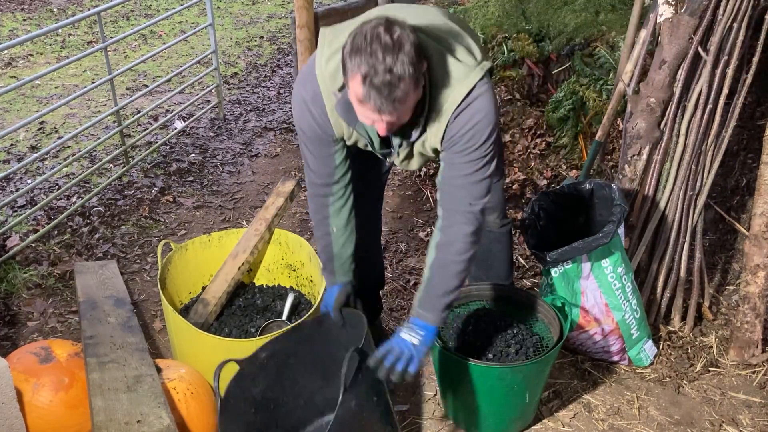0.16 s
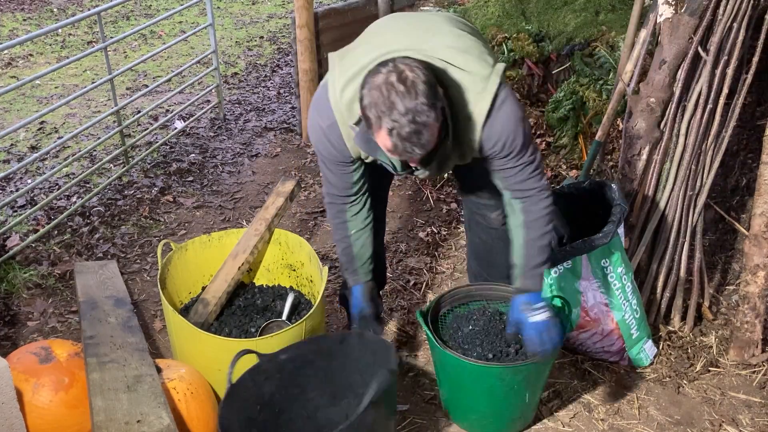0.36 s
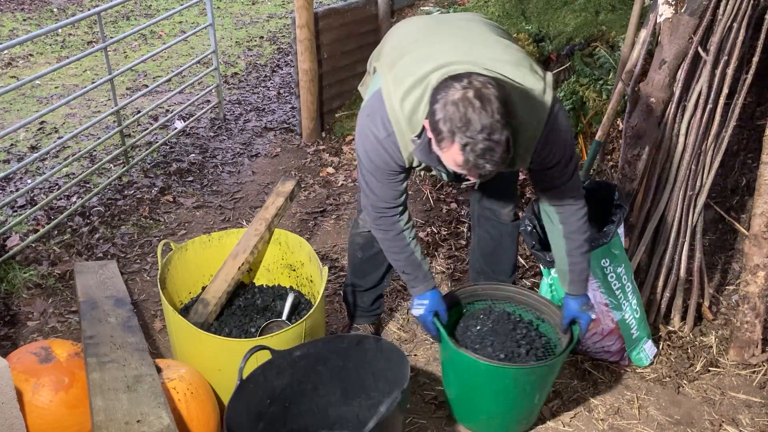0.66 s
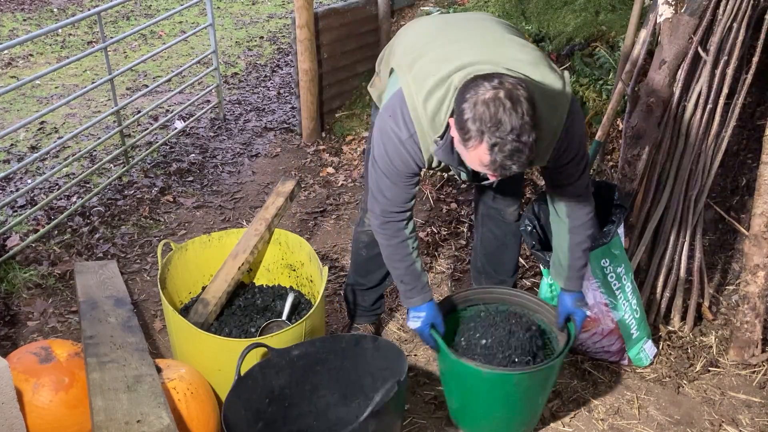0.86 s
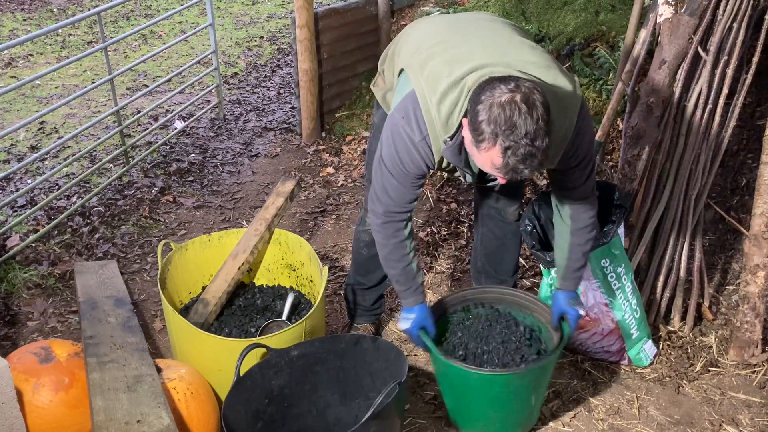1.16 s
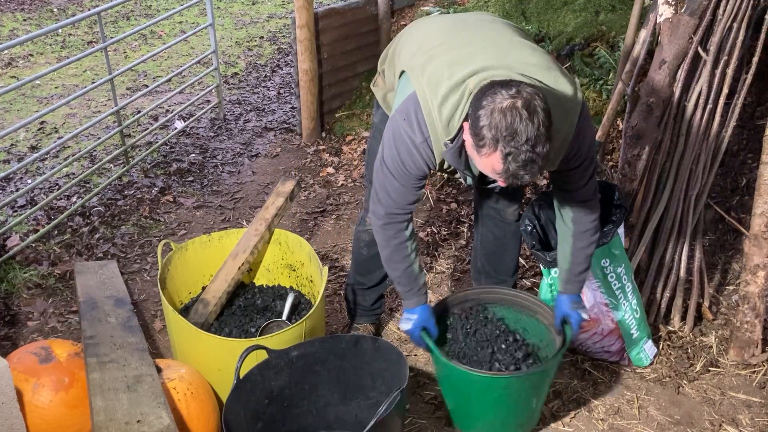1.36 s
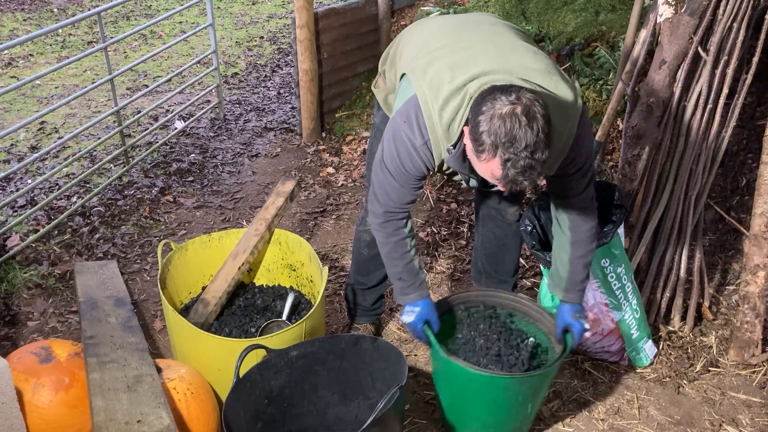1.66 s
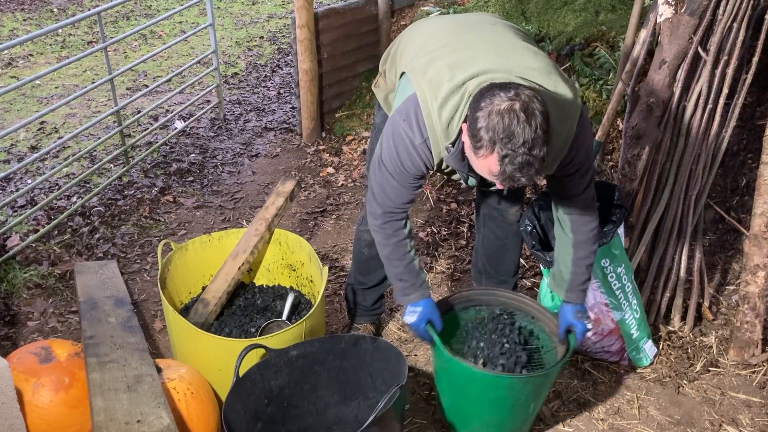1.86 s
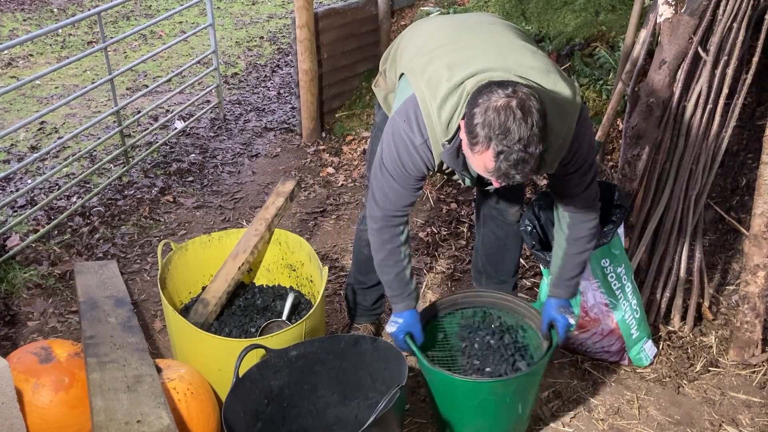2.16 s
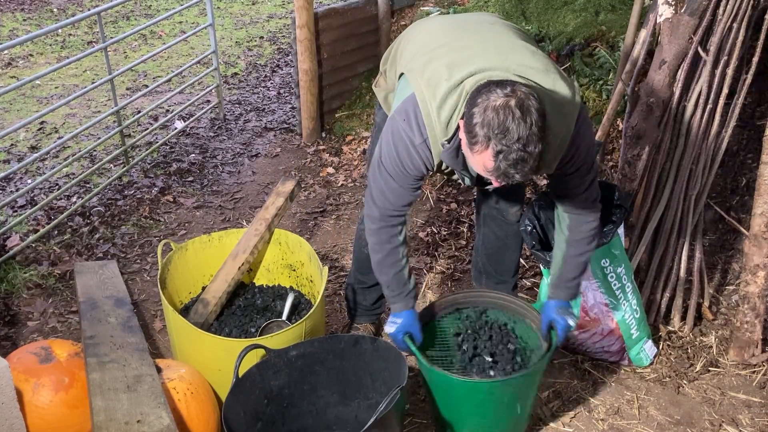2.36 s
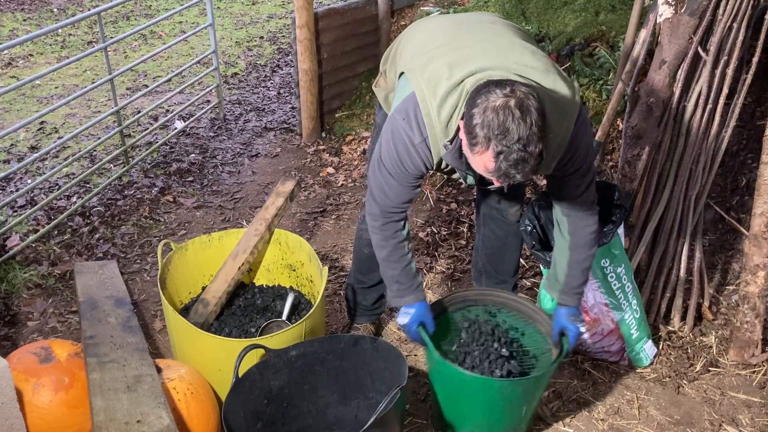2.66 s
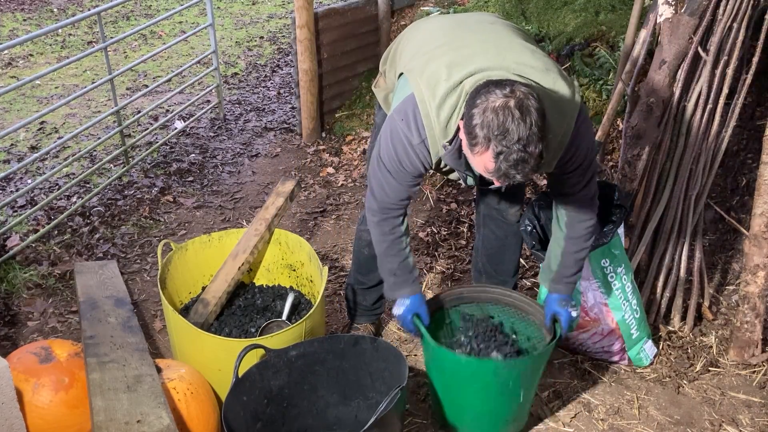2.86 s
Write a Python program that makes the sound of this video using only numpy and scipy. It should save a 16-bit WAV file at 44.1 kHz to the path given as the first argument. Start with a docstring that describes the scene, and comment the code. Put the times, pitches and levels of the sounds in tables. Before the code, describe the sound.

Charcoal lumps shaken fast through a wire sieve over a plastic bucket, after an empty tub lands

```python
"""Charcoal shaken through a sieve

Outdoors, an empty plastic tub lands and booms, with dull scuffs from tub, boots and gloves as it settles.
Then a wire sieve is shaken about ten strokes a second in a plastic bucket. Its rim blows are decaying
modes and coloured noise; the charcoal is random grains, crackling (fine) and clattering (coarse) in surges
and ringing the mesh wires. A scrape, slow pushes of air and coloured noise for the open air lie beneath.
"""
import sys
import numpy as np
from scipy import signal
from scipy.fft import rfft, irfft, next_fast_len
from scipy.io import wavfile
from scipy.ndimage import map_coordinates

SR = 44100
rng = np.random.default_rng(int(sys.argv[2]) if len(sys.argv) > 2 else 0)


def file_out(sig):
    """Save sig as 16-bit WAV at sys.argv[1]."""
    # one column per channel
    cols = np.atleast_2d(sig).T
    # limit, then scale
    lim = np.clip(cols, -1, 1)
    pcm = np.round(lim * 32767).astype(np.int16)
    wavfile.write(sys.argv[1], SR, pcm)


N = 132300  # samples, 3 s


def amp(db):
    """Level in dB to linear gain."""
    return 10 ** (np.asarray(db) / 20)


def unit(x):
    """Scale a signal to rms 1."""
    return x / np.sqrt(np.mean(x ** 2) + 1e-20)


def noise(t):
    """White noise as long as the time axis t."""
    return rng.standard_normal(len(t))


def add(track, s, sound):
    """Lay a sound into the track at s seconds."""
    i = max(0, round(s * SR))
    track[i:i + len(sound)] += sound[:N - i]


def coloured(x, points):
    """Filter x causally (minimum phase) to a curve of (frequency, level) points, at rms 1."""
    m = 2 * next_fast_len(len(x))
    hz, db = np.transpose(points)
    log_bins = np.log(np.fft.rfftfreq(m, 1 / SR) + 1)
    curve_db = np.interp(log_bins, np.log(hz), db)
    # folding the cepstrum onto positive time makes the filter causal
    cepstrum = irfft(np.log(amp(curve_db)), m)
    cepstrum[1:m // 2] *= 2
    cepstrum[m // 2 + 1:] = 0
    response = np.exp(rfft(cepstrum))
    return unit(irfft(rfft(x, m) * response, m)[:len(x)])


def decay(t, t60):
    """Exponential fade that falls 60 dB in t60 seconds."""
    return np.exp(-np.log(1000) * t / t60)


WAVER_PER_S, WAVER_RADIANS = 93.3, 0.55  # random points per second, depth


def waver(t):
    """Flexing plastic never holds its pitch: a random drift of phase, zero at the blow."""
    drift = map_coordinates(rng.standard_normal(128), [t * WAVER_PER_S], mode="mirror")
    return WAVER_RADIANS * (drift - drift[0]) * np.minimum(t * WAVER_PER_S, 1)


def ring(modes, t, levels_db=None):
    """Sum of damped, wavering sine modes, optionally each with its own extra level."""
    hz, db, t60 = np.transpose(modes)[:, :, None]
    if levels_db is not None:
        db = db + levels_db
    drift = np.array([waver(t) for _ in modes])
    waves = np.sin(2 * np.pi * hz * t + drift)
    return np.sum(amp(db) * decay(t, t60) * waves, axis=0)


def grains(per_s, spread_db):
    """Random tiny collisions of either sign, many weak and a few strong."""
    size = amp(spread_db * np.minimum(rng.exponential(size=N), 5.5))
    hits = rng.random(N) < per_s / SR
    return hits * size * rng.choice([-1, 1], N)


# lump collisions, also used by the scrape and the dull scuffs
LUMPS_PER_S, LUMP_SPREAD_DB = 1100, 1.5

WALL_DB, WALL_T60_S = 10.5, 0.11
THUD_DB, THUD_HZ, THUD_T60_S, THUD_ATTACK_S = 8.5, 99, 0.03, 0.0011
BASE_DB, BASE_HZ, BASE_T60_S = -11.5, 55, 0.15  # driven by the thud level
CLACK_DB, CLACK_T60_S = 1.5, 0.05
RIM_DB, RIM_SCATTER_DB = -3.5, 3
RIM_SHIFT = 0.11  # spread of the natural log of the rim's time scale from blow to blow

# blows on the bucket, first from the passing tub, then from the sieve rim:
# (time [s], wall pitch [Hz], relative wall level [dB], relative thud level [dB], relative clack level [dB])
BUCKET_BLOWS = [(.004, 222.6, -38, -38, -43.5), (0.028, 227, -38, -60, -57),
                (0.8024, 207, -41.5, -17, -33.5), (.812, 240, -32.5, -41, -25),
                (0.8825, 225, -28, -34, -32.5), (0.908, 241, -40, -50, -32), (0.981, 240, -31.5, -22, -46),
                (1.094, 227, -23, -51, -23), (1.11, 258, -26, -55, -28), (1.1856, 204, -38, -17.5, -29),
                (1.196, 232, -33, -57, -31.5), (1.2887, 239, -30, -51, -29), (1.3, 233, -34, -19.5, -30),
                (1.3843, 244, -30.5, -31, -29), (1.4771, 212.5, -30, -22, -27.5),
                (1.49, 277, -36, -32, -24), (1.6011, 216, -32.5, -22, -27), (1.6654, 226, -31, -37, -25.5),
                (1.6772, 238, -30.5, -18, -36), (1.7888, 254.4, -24, -22, -25),
                (1.859, 228, -32, -38, -30.5), (1.87, 230.5, -29, -29, -32),
                (1.9771, 256.5, -22.5, -19.5, -29), (2.069, 232, -26, -39, -25),
                (2.086, 237, -37, -33, -37), (2.1757, 257, -23.5, -15.5, -25),
                (2.2598, 239, -27.5, -26, -25), (2.298, 245, -55, -45, -30), (2.3788, 242, -28, -17, -31.5),
                (2.4629, 237, -25, -52, -30), (2.476, 245, -35, -40, -29), (2.581, 256, -28, -22.5, -25),
                (2.6635, 230, -30, -26, -26.5), (2.778, 238, -29.5, -13.5, -26.5),
                (2.792, 243, -28.5, -42, -34), (2.871, 233, -27.5, -21, -38), (2.883, 249, -28, -35, -35)]
# upper modes of bucket and rim before each blow's shift and scatter:
# (frequency [Hz], relative level [dB], t60 [s])
RIM_MODES = [(463.6, -1.5, 0.036), (571, 2.5, 0.045), (654, 3, 0.065), (782, -9, 0.11), (875, -7, 0.15),
             (1047, -11, 0.12)]
# tone of clattering lumps and of the clack: (frequency [Hz], relative level [dB])
CLATTER_TONE = [(100, -22.5), (250, 6), (380, -2), (520, 0), (680, 4.5), (900, 1), (1100, -8), (1350, -9.5),
                (1580, -3), (2000, -30.5), (4000, -14), (16000, -111)]


def knocks():
    """Each blow thuds, rocks the bucket on its base, rings its wall and clacks with its rim modes."""
    out, t = np.zeros(N), np.arange(SR // 4) / SR
    for s, hz, wall_db, thud_db, clack_db in BUCKET_BLOWS:
        wall = decay(t, WALL_T60_S) * np.sin(2 * np.pi * hz * t + waver(t))
        thud = decay(t, THUD_T60_S) * np.cos(2 * np.pi * THUD_HZ * t)
        thud *= 1 - np.exp(-t / THUD_ATTACK_S)
        base = decay(t, BASE_T60_S) * np.sin(2 * np.pi * BASE_HZ * t)
        clack = amp(CLACK_DB) * decay(t, CLACK_T60_S) * coloured(noise(t), CLATTER_TONE)
        # the point of contact scales the rim's pitches, and its decay with them
        rim_time = t * np.exp(RIM_SHIFT * rng.standard_normal())
        scatter_db = RIM_SCATTER_DB * rng.standard_normal((len(RIM_MODES), 1))
        rim = amp(RIM_DB) * ring(RIM_MODES, rim_time, scatter_db)
        body = amp(wall_db + WALL_DB) * wall + amp(thud_db + THUD_DB) * thud
        body -= amp(thud_db + BASE_DB) * base
        add(out, s, body + amp(clack_db) * (clack + rim))
    return out


SURGE_RISE_S, SURGE_FALL_S = 0.014, 0.016  # standard deviations of the power swell
CRACKLE_DB, CLATTER_DB, SLIDE_CLATTER_DB = -1, -6.5, 0.5
CRACKLES_PER_S, CRACKLE_SPREAD_DB = 12000, 1
CLUSTERS_PER_S, CRUMBLE_T60_S = 600, 0.048
TICK_T60_S = 0.045
CLINK_DB = -6  # against the crumbs
MESH_DB = -15.5  # against the crackle

# charcoal thrown across the mesh: (time of peak [s], relative crackle level [dB], relative clatter level [dB])
SURGES = [(0.818, -37.5, -37), (0.903, -36, -44), (0.997, -35, -23), (1.113, -34, -27.5),
          (1.198, -39.5, -28), (1.311, -38, -25), (1.396, -37.5, -25.5), (1.5, -33.5, -24.5),
          (1.608, -30, -25.5), (1.697, -35, -39), (1.796, -31, -31), (1.884, -33, -30), (1.977, -32, -57),
          (2.104, -28.5, -28.5), (2.18, -35, -28.5), (2.285, -28.5, -27.5), (2.394, -30.5, -29),
          (2.49, -28.5, -26.5), (2.593, -28.5, -27.5), (2.695, -30.5, -26), (2.794, -32.5, -27),
          (2.886, -32.5, -24.5)]
# pieces sliding and falling through between surges: (time [s], level [dB])
SLIDE_LEVELS = [(.72, -69), (.78, -49), (.86, -54), (.95, -40.5), (1.04, -41), (1.14, -34), (1.23, -39),
                (1.35, -34), (1.45, -40.5), (1.57, -37.5), (1.67, -42), (1.93, -40.5), (2.05, -39.5),
                (2.22, -42), (2.64, -40.5), (2.74, -39.5), (2.83, -42.5), (2.93, -44), (3, -33.5)]
# single hard strikes of a lump on the wire: (time [s], level [dB])
WIRE_STRIKES = [(0.833, -36), (0.87, -34), (1.24, -39), (1.396, -30), (2.164, -27), (2.359, -29),
                (2.569, -26), (2.682, -24.5), (2.855, -29), (2.882, -26.5)]
# tone of small pieces, and of grit: (frequency [Hz], relative level [dB])
CRACKLE_TONE = [(500, -36), (1200, -7), (2000, -5.5), (3000, -2.5), (3900, -2.5), (4400, 0.5), (5000, -4.5),
                (7000, -7), (8500, -14), (10300, -9.5), (11700, -13.5), (12700, -10.5), (14000, -20.5),
                (16000, -36)]
# ringing wires of the mesh: (frequency [Hz], relative level [dB], t60 [s])
MESH_MODES = [(2566, 14, 0.25), (3870, 14, 0.074), (4430, 17, 0.07), (5900, 11, 0.038)]


def charcoal():
    """Lumps clatter and sprays of grains ring the wires, swelling with every throw over an uneven slide."""
    t = np.arange(N) / SR
    brief = t[:SR // 20]

    # powers of the small and large pieces over time
    slide_db = np.interp(t, *np.transpose(SLIDE_LEVELS), left=-120)
    fine, coarse = amp(slide_db) ** 2, amp(slide_db + SLIDE_CLATTER_DB) ** 2
    for s, crackle_db, clatter_db in SURGES:
        width = np.where(t < s, SURGE_RISE_S, SURGE_FALL_S)
        swell = np.exp(-.5 * ((t - s) / width) ** 2)
        fine += swell * amp(crackle_db + CRACKLE_DB) ** 2
        coarse += swell * amp(clatter_db + CLATTER_DB) ** 2
    for s, db in WIRE_STRIKES:
        add(fine, s, (amp(db) * decay(brief, TICK_T60_S)) ** 2)

    # each cluster sheds a short, fading spray of crumbs
    cluster_power = grains(CLUSTERS_PER_S, LUMP_SPREAD_DB) ** 2
    spray_power = signal.fftconvolve(cluster_power, decay(brief, CRUMBLE_T60_S) ** 2)[:N]
    spray = np.sqrt(np.abs(spray_power))
    crumbs = unit(spray * grains(CRACKLES_PER_S, CRACKLE_SPREAD_DB))

    crackle = np.sqrt(fine) * coloured(crumbs + amp(CLINK_DB) * clinks(), CRACKLE_TONE)
    wires = signal.fftconvolve(crackle, ring(MESH_MODES, t[:SR // 6]))[:N]
    wires = unit(wires) * crackle.std()
    clatter = np.sqrt(coarse) * coloured(grains(LUMPS_PER_S, LUMP_SPREAD_DB), CLATTER_TONE)
    return crackle + amp(MESH_DB) * wires + clatter


CLINKS_PER_S, CLINK_T60_S, CLINK_SPREAD_DB = 1500, 0.015, 1
CLINK_HZ, CLINK_OCTAVES = 5550, 0.3435  # middle pitch, mean distance from it before limiting


def clinks():
    """Brittle pieces ring briefly, each at its own pitch, the higher ones stronger."""
    t = np.arange(SR // 60) / SR
    place, up, down, chance = rng.random((4, int(CLINKS_PER_S * N / SR), 1))
    hz = np.clip(CLINK_HZ * 2 ** (CLINK_OCTAVES * np.log(up / down)), 1200, 18000)
    size = amp(CLINK_SPREAD_DB * np.minimum(-np.log(chance), 4.5))
    waves = size * decay(t, CLINK_T60_S) * np.sin(2 * np.pi * hz * t)
    waves *= np.sqrt(hz)
    where = (place * N).astype(int) + np.arange(len(t))
    return unit(np.bincount(where.ravel(), waves.ravel(), N)[:N])


SCRAPE_S, SCRAPE_WIDTH_S = 1.093, 0.061  # centre, standard deviation of its power
SCRAPE_DB = -34.5  # before the swell

# resonances of the scraped rim: (frequency [Hz], relative level [dB], t60 [s])
SCRAPE_MODES = [(850, 0, 0.033), (1730, -3, 0.013)]


def scrape():
    """The load slides along the rim once; its tiny slips excite two resonances."""
    t = np.arange(N) / SR
    slips = grains(LUMPS_PER_S, LUMP_SPREAD_DB)
    rub = signal.fftconvolve(slips, ring(SCRAPE_MODES, t[:SR // 10]))[:N]
    swell = np.exp(-((t - SCRAPE_S) / SCRAPE_WIDTH_S / 2) ** 2)
    return amp(SCRAPE_DB) * unit(rub) * swell


SWAY_DB, SWAY_S = -24.5, 0.017  # depth of each pulse, its width


def sway():
    """The rocking bucket pushes a slow wave of air at each surge: a dip between two smaller rises."""
    u = (np.arange(N) / SR - np.array(SURGES)[:, :1]) / SWAY_S
    return amp(SWAY_DB) * np.sum((u ** 2 - 1) * np.exp(-.5 * u ** 2), axis=0)


SLAP_T60_S, SLAP_ATTACK_S = 0.02, 0.0011  # soft plastic takes a moment to give
SHUDDER_DB, SHUDDER_T60_S = -16.5, 0.23  # against the slap
TUB_REST_S, TUB_REST_T60_S = 0.42, 0.098  # lying on the ground, the walls stop swinging

# the empty tub bumps and lands: (time [s], relative boom level [dB], relative slap level [dB])
DROPS = [(.184, -15.5, -11), (0.41, -28, -44)]
# modes of the tub walls: (frequency [Hz], relative level [dB], t60 [s])
TUB_MODES = [(49.24, -1, 0.98), (98.8, -15.5, 0.78), (161.3, -2.5, 0.36), (224, -13.5, 0.62),
             (259, -11.5, 0.66), (607, -28, 0.19), (820, -14.5, 0.15), (1255, -21, 0.084)]
# tone of the slap on the ground: (frequency [Hz], relative level [dB])
SLAP_TONE = [(100, -18), (500, 2.5), (1100, 5), (2200, -5.5), (3400, -16), (6000, -15.5), (16000, -31)]
# dull tone of rubbed and shuddering plastic: (frequency [Hz], relative level [dB])
SCUFF_TONE = [(100, 5), (330, 2.5), (520, 10.5), (850, 6.5), (1300, -3.5), (1900, -12.5), (2700, -27),
              (16000, -51)]


def tub():
    """The empty tub slaps the ground; its soft walls shudder and boom until it lies still."""
    out, t = np.zeros(N), np.arange(SR // 2) / SR
    attack = 1 - np.exp(-t / SLAP_ATTACK_S)
    for s, boom_db, slap_db in DROPS:
        slap = decay(t, SLAP_T60_S) * coloured(noise(t), SLAP_TONE)
        shudder = amp(SHUDDER_DB) * decay(t, SHUDDER_T60_S) * coloured(noise(t), SCUFF_TONE)
        boom = amp(boom_db) * ring(TUB_MODES, t)
        add(out, s, boom + amp(slap_db) * attack * (slap + shudder))
    time_at_rest = np.maximum(np.arange(N) / SR - TUB_REST_S, 0)
    return out * decay(time_at_rest, TUB_REST_T60_S)


SCUFF_RISE_SHARE = 0.018  # rise time as a share of t60: longer rubs start more softly
SNAP_T60_S = 0.008

# tub, boots and gloves scuffing: (time [s], dull level [dB], gritty level [dB], t60 [s])
SCUFFS = [(0.233, -27.5, -54, 0.081), (0.333, -35.5, -60, 0.2), (0.352, -25.5, -49.5, 0.096),
          (0.366, -34, -63, 0.25), (.41, -26, -49, 0.08), (.432, -39, -75, 0.097), (0.464, -28, -76, 0.067),
          (0.476, -31, -75, 0.089), (0.537, -35, -62, 0.18), (0.597, -39, -56, 0.13),
          (0.7, -34, -68, 0.065), (0.742, -31, -49, 0.13)]
# grit snapping under the tub and the gloves: (time [s], level [dB])
SNAPS = [(0.232, -48), (0.259, -49), (0.273, -49), (0.559, -47), (0.5962, -46)]


def scuffs():
    """Short dull rubs made of tiny stick-slip grains, with a little grit snapping in them."""
    dull, gritty, snaps = np.zeros((3, N))
    t = np.arange(SR // 4) / SR
    for s, dull_db, grit_db, t60 in SCUFFS:
        shape = (1 - np.exp(-t / (SCUFF_RISE_SHARE * t60))) * decay(t, t60)
        add(dull, s, amp(dull_db) * shape)
        add(gritty, s, amp(grit_db) * shape)
    for s, db in SNAPS:
        add(snaps, s, amp(db) * decay(t, SNAP_T60_S) * coloured(noise(t), CRACKLE_TONE))
    dull_rub = dull * coloured(grains(LUMPS_PER_S, LUMP_SPREAD_DB), SCUFF_TONE)
    gritty_rub = gritty * coloured(grains(1500, spread_db=4), CRACKLE_TONE)
    return snaps + dull_rub + gritty_rub


AIR_DB = -33

# tone of the open air: (frequency [Hz], relative level [dB])
AIR_TONE = [(10, 22.5), (25, 3), (60, 4.5), (150, -14), (1000, -23), (2500, -39.5), (16000, -45.5)]


def open_air():
    """Steady outdoor background: noise weighted to the lows."""
    return amp(AIR_DB) * coloured(rng.standard_normal(N), AIR_TONE)


def scene():
    """Tub, sieve and charcoal in the open air, on one channel."""
    sieve = knocks() + charcoal() + scrape() + sway()
    return (sieve + tub() + scuffs() + open_air())[None]


CLIP_TOP, TOP_HZ = 0.28, 15850  # ceiling of the rounding (full scale 1), band limit


def record(dry):
    """The recorder rounds off the highest peaks and keeps nothing above its band limit."""
    held = dry / (1 + np.abs(dry / CLIP_TOP) ** 6) ** (1 / 6)
    m = next_fast_len(N + SR // 2)
    in_band = np.fft.rfftfreq(m, 1 / SR) < TOP_HZ
    return irfft(rfft(held, m) * in_band, m)[:, :N]


dry = scene()
out = record(dry)
file_out(out)
```